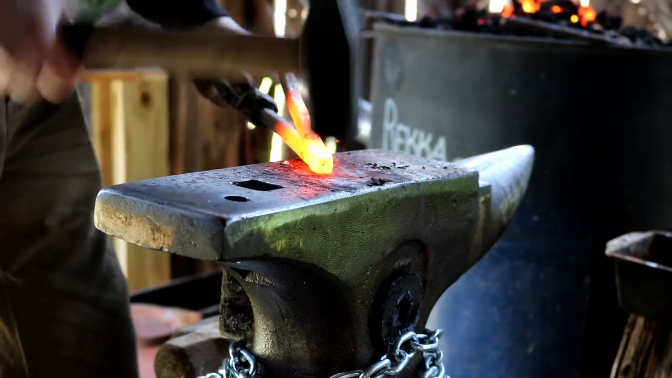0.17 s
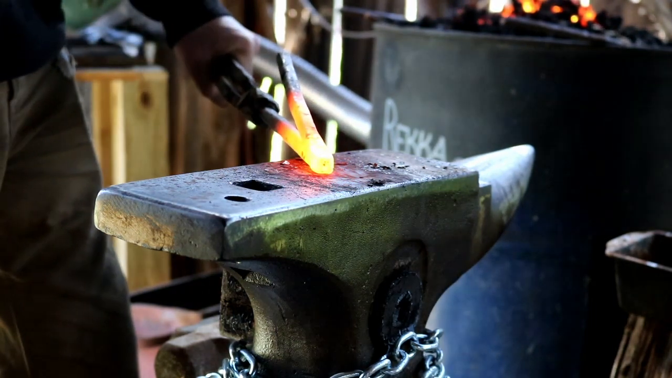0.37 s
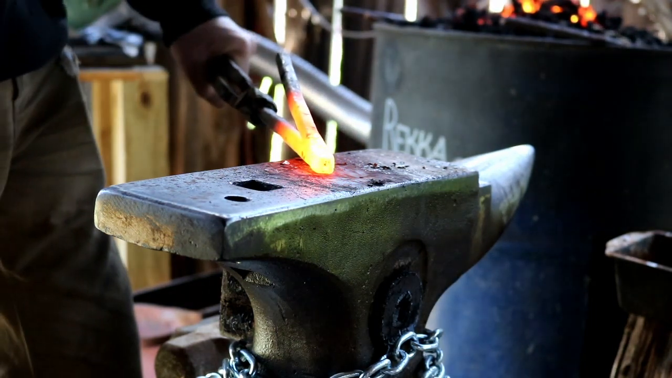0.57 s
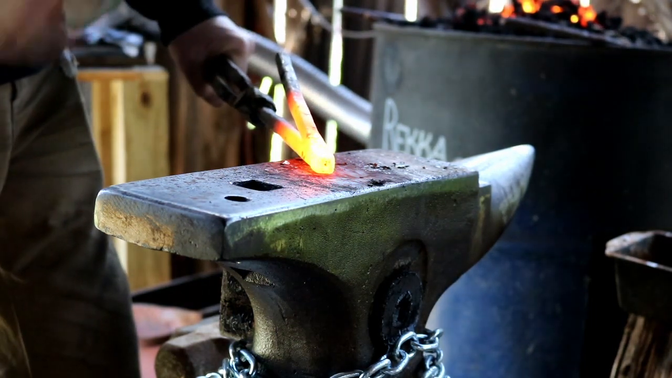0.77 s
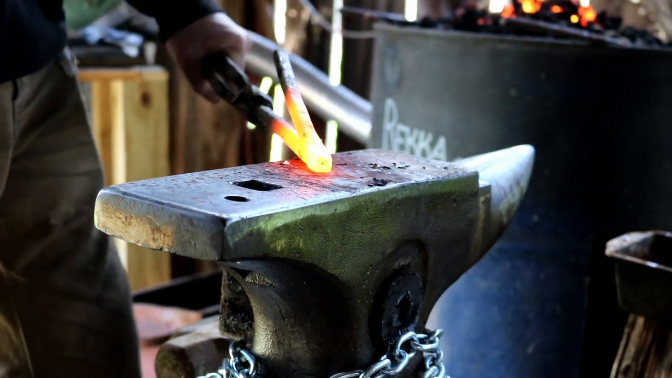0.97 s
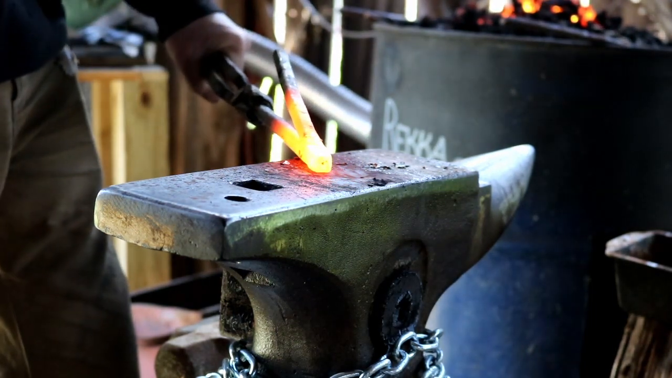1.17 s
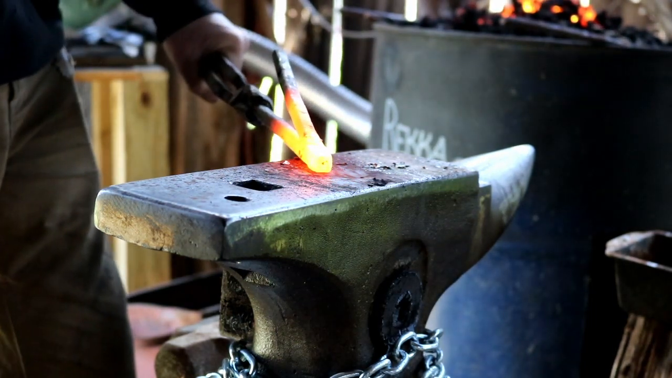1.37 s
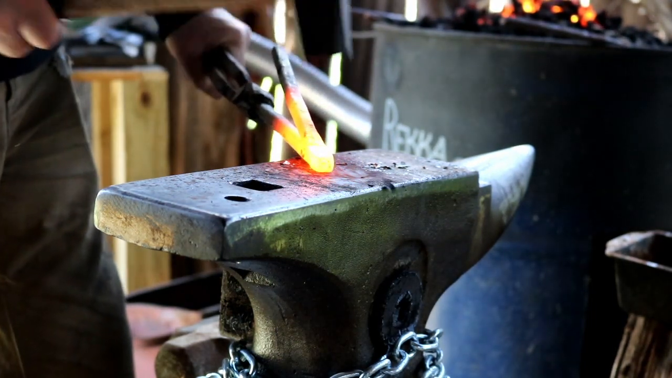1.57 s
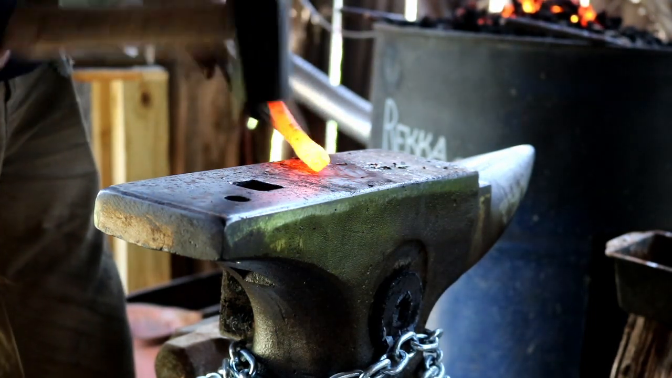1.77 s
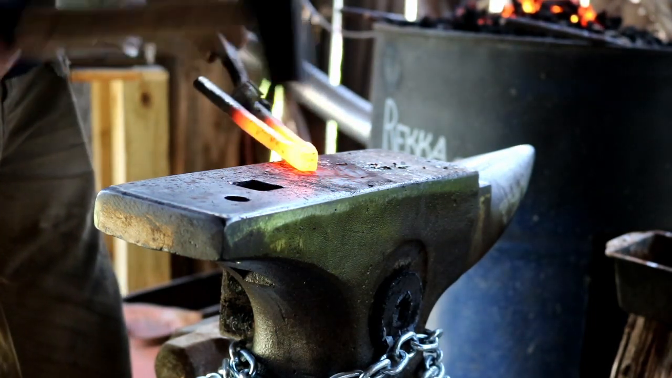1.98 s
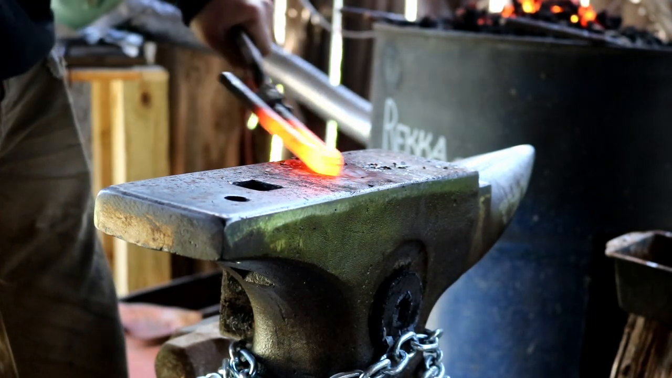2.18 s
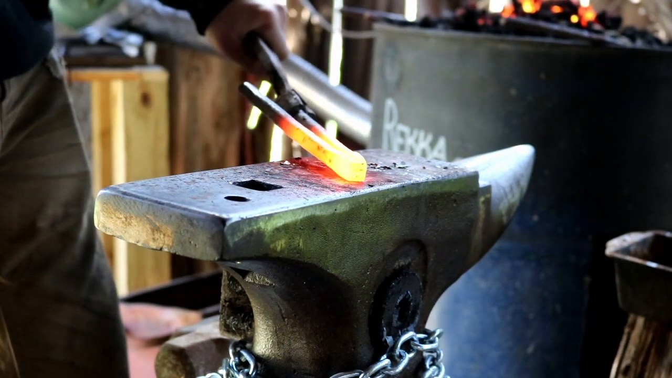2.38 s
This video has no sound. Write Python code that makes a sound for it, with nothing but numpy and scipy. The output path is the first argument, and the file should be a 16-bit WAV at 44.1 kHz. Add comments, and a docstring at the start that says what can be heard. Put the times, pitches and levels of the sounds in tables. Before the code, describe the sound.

A hand hammer strikes hot steel on an anvil with hard, bright cracks at about 0.2, 0.9 and 1.5 seconds, each with a brief ping, short damped ring and faint low boom. A tiny tick of the shifted bar comes at 1.8, then a lighter, duller blow at 1.9. The small forge echoes briefly over quiet rumble and wide hiss; the close microphone overloads on the hard blows.

```python
"""A hand hammer draws out a hot steel bar on an anvil: three hard blows, a small tick, then a lighter, duller blow.
Each blow is a crack of shaped noise, a brief ping of the hammer head and the short ring of the chained anvil
(fading sine waves), with a crowd of weak clang tones and a low boom of the stand.
The small forge answers for a third of a second, over a quiet rumble and a wider hiss.
The near microphone overloads on the hard blows."""
import sys
import numpy as np
from scipy import signal
from scipy.fft import rfft, irfft
from scipy.io import wavfile
from scipy.ndimage import uniform_filter1d

SR = 44100
rng = np.random.default_rng(int(sys.argv[2]) if len(sys.argv) > 2 else 0)


def materialize(psi):
    """Save the field psi as 16-bit PCM at rate SR to the path in sys.argv[1].

    A 1-D psi becomes a single channel; in a 2-D psi each row is a channel.
    """
    bounded = np.clip(np.atleast_2d(psi).T, -1, 1)
    quanta = np.round(bounded * 32767).astype(np.int16)
    wavfile.write(sys.argv[1], SR, quanta)


N = 110250
TIME = np.arange(N) / SR


def from_db(db):
    """Turn decibels into a gain."""
    return 10 ** (np.asarray(db) / 20)


def rms_one(x):
    """Scale a sound so that its rms is 1."""
    return x / np.sqrt(np.mean(x ** 2) + 1e-20)


def at_hz(points, hz):
    """Read a table between its rows, on a log-frequency axis."""
    table_hz, values = np.transpose(points)
    return np.interp(np.log(np.maximum(hz, 1)), np.log(table_hz), values)


def coloured(x, spectrum):
    """Make each frequency louder or softer, following a table of f/Hz, level/dB."""
    hz = np.arange(len(x) // 2 + 1) * SR / len(x)
    return irfft(rfft(x) * from_db(at_hz(spectrum, hz)), len(x))


def noise(spectrum):
    """Steady noise of a given colour, rms 1."""
    return rms_one(coloured(rng.standard_normal(N), spectrum))


def butter(x, hz, kind):
    """Butterworth filter built at order 2."""
    sections = signal.butter(2, np.clip(hz, 10, .47 * SR), kind, fs=SR, output="sos")
    return signal.sosfilt(sections, x + 1e-18)


def dying(start, t60, hold=0):
    """Envelope that jumps up at start, holds, then falls 60 dB in every t60 seconds."""
    fall_db = 60 * np.clip((TIME - start - hold) / t60, 0, 4)
    return (TIME >= start) * from_db(-fall_db)


# forge rumble and hiss: f/Hz, level/dB (per Hz, relative)
FLOOR_COLOUR = [(12, -31), (20, -4), (53, -1.5), (137, -6), (171, -10.5), (252, -11), (282, -14),
                (372, -13.5), (746, -17.5), (811, -17), (1230, -20), (6720, -22.5), (15500, -22)]
# how wide the hiss is: f/Hz, level/dB (side minus mid)
SIDE_COLOUR = [(60, -16), (180, -8), (550, -6.5), (1650, -3.5), (4970, -2), (15000, -3)]
FLOOR_DB = -58


def forge_floor():
    """Steady rumble and hiss: separate mid and side noises, the side strongest in the treble."""
    mid = from_db(FLOOR_DB) * noise(FLOOR_COLOUR)
    side = from_db(FLOOR_DB) * coloured(noise(FLOOR_COLOUR), SIDE_COLOUR)
    return mid, side


# crack of hammer, bar and scale: f/Hz, level/dB (per Hz, relative)
CRACK_COLOUR = [(60, -24), (130, -7), (200, -1), (280, -10.5), (370, -5), (520, -14.5), (720, -4.5),
                (1000, -2.5), (1350, -3.5), (1750, 3.5), (2300, 7), (2900, -4), (3500, 0), (4900, -6.5),
                (6500, -3), (10000, 5.5), (11800, -5), (15500, -3)]
CRACK_T60_S, RATTLE_T60_S, RATTLE_DB = 0.025, 0.039, -11
EVEN_WIDTH_HZ = 220


def crack(start, db, top_hz, bottom_hz):
    """The contact itself, then a short rattle of bar and tongs: a fast-dying burst of noise."""
    shape = dying(start, CRACK_T60_S) + from_db(RATTLE_DB) * dying(start, RATTLE_T60_S)
    bins = rfft(rng.standard_normal(N) * shape)
    # even out the spectrum, so that all blows share one colour before their own top and bottom cuts
    local_power = uniform_filter1d(np.abs(bins) ** 2, size=int(EVEN_WIDTH_HZ * N / SR))
    even = irfft(bins / np.sqrt(local_power), N)
    burst = rms_one(coloured(even, CRACK_COLOUR) * (TIME >= start))
    burst = burst * np.sqrt(np.mean(shape ** 2))
    return from_db(db) * butter(butter(burst, top_hz, "low"), bottom_hz, "high")


# the waver grows to its full share over the build time, as the room's reflections arrive
WAVER_SHARE, WAVER_HZ, WAVER_BUILD_S = .85, 36, 0.022


def waver(age):
    """Gain and phase of one tone as the room's reflections mix with it."""
    knots = np.arange(0, 1, 1 / (2 * WAVER_HZ))
    re, im = rng.standard_normal((2, len(knots))) / np.sqrt(2)
    wander = np.interp(age, knots, re + 1j * im)
    return 1 + WAVER_SHARE * np.minimum(age / WAVER_BUILD_S, 1) * wander


RING_BEND = 1.4   # above 1: a tone lingers, then drops


def ring(start, modes_hz, t60s, levels_db):
    """Natural tones (modes) of struck steel, each a wavering sine that falls 60 dB in its t60."""
    age = TIME[:SR]
    out = np.zeros(N + SR)
    first = int(start * SR)
    for hz, t60, db in zip(modes_hz, t60s, levels_db):
        turning = waver(age) * np.exp(2j * np.pi * hz * age)
        partial = np.imag(turning) * rng.choice([-1, 1])
        fall_db = 60 * np.minimum(age / t60, 3) ** RING_BEND
        out[first:first + SR] += from_db(db - fall_db) * partial
    return out[:N]


# hammer head modes: f/Hz
HEAD_MODES_HZ = [990, 2275, 8215, 10280, 12745]
# time for each head mode to fall 60 dB: t/s
HEAD_FADE_S = [0.11, .07, 0.073, 0.033, 0.016]
# how hard each blow excites the head, one row a blow, one column a mode: level/dB (relative)
HEAD_STRIKES = [(-22.5, -19, -22, -11, -28.5), (-23.5, -24.5, -10.5, -9.5, -3.5),
                (-25.5, -19.5, -13, -6, -8), (-37.5, -26, -24.5, -16, -19.5)]
HEAD_DB = 3


def hammer_head(start, levels_db):
    """Brief ping of the hammer head's few modes."""
    return from_db(HEAD_DB) * ring(start, HEAD_MODES_HZ, HEAD_FADE_S, levels_db)


# anvil modes: f/Hz
ANVIL_MODES_HZ = [1098, 1147, 1970, 2335, 3545, 4135, 4597, 5634, 6010, 6770, 7437, 8199, 9997, 10781,
                  12050, 13025, 14870, 15475]
# time for each anvil mode to fall 60 dB: t/s
ANVIL_FADE_S = [0.22, 0.24, 0.26, 0.18, 0.23, .2, 0.14, .18, .13, .2, .2, 0.18, .18, 0.26, 0.3, .32, .25,
                .45]
# how hard each blow excites the anvil from the spot where it lands,
# one row a blow, one column a mode: level/dB (relative)
ANVIL_STRIKES = [(-34, -34, -34.5, -30, -39, -41.5, -45, -41.5, -23.5, -34, -36.5, -17, -17, -24, -46, -47, -45.5, -52),
                 (-30, -33, -29, -32, -33, -39, -40, -36, -26, -32, -39, -16, -25, -41.5, -41, -48, -45.5, -50.5),
                 (-32.5, -38, -28.5, -25.5, -36, -33, -45.5, -34.5, -31.5, -30.5, -29, -19.5, -24.5, -29, -38.5, -41, -46.5, -56.5),
                 (-33.5, -31.5, -32, -21.5, -31.5, -26.5, -20.5, -39, -19, -42, -56.5, -36.5, -39.5, -44.5, -47.5, -57.5, -70, -79)]
ANVIL_DB = -0.5


def anvil(start, levels_db):
    """Short ring of the chained anvil's modes."""
    return from_db(ANVIL_DB) * ring(start, ANVIL_MODES_HZ, ANVIL_FADE_S, levels_db)


CLANG_LOW_HZ, CLANG_HIGH_HZ, CLANG_T60_S, CLANG_SPREAD_DB = 2214, 6527, .2, 1


def clang(start, db, count=24):
    """Many weak, close modes of bar, tongs and anvil that roughen the ring."""
    modes_hz = np.geomspace(CLANG_LOW_HZ, CLANG_HIGH_HZ, count) * rng.uniform(.98, 1.02, count)
    levels_db = db + CLANG_SPREAD_DB * rng.standard_normal(count)
    return ring(start, modes_hz, np.full(count, CLANG_T60_S), levels_db)


BOOM_HZ, BOOM_WIDTH_HZ = 60, 20
BOOM_RISE_S, BOOM_HOLD_S, BOOM_T60_S = .008, 0.16, .18


def boom(start, db):
    """Low shudder of stand and shed: a narrow band of noise that swells, holds and dies."""
    band_hz = [BOOM_HZ - BOOM_WIDTH_HZ / 2, BOOM_HZ + BOOM_WIDTH_HZ / 2]
    rumble = butter(rng.standard_normal(N), band_hz, "band")
    rise = np.clip((TIME - start) / BOOM_RISE_S, 0, 1)
    shape = dying(start, BOOM_T60_S, BOOM_HOLD_S) * rise
    loudness = np.sqrt(np.average(rumble ** 2, weights=shape ** 2))
    return from_db(db) * rumble * shape / loudness


# time for the room's echo to fall 60 dB: f/Hz, t/s
ROOM_FADE = [(100, 0.4038), (300, 0.2749), (1000, 0.2636), (2500, 0.2133), (6000, 0.1783), (10000, 0.17),
             (15000, 0.11)]
# colour of the room's echo: f/Hz, level/dB (relative)
ROOM_TONE = [(100, 3.5), (240, -5), (380, -1), (650, 4), (1000, 3.5), (2500, -6.5), (6000, 1), (10000, -5),
             (15000, 7)]
ROOM_DELAY_S, ROOM_BUILD_S, ROOM_BEND = .002, .003, 1.047   # bend above 1: the tail lingers, then drops


def room_response():
    """Dense reflections of the forge: bands of noise, dying faster in the treble; energy 1."""
    hz = np.arange(SR // 2 + 1)
    white = rfft(rng.standard_normal(SR))
    age = np.maximum(TIME[:SR] - ROOM_DELAY_S, 0)
    edges, out = np.geomspace(40, 18000, 25), 0
    for low, high in zip(edges, edges[1:]):
        centre = np.sqrt(low * high)
        band = irfft(white * (hz >= low) * (hz < high), SR)
        fall_db = 60 * np.minimum(age / at_hz(ROOM_FADE, centre), 3) ** ROOM_BEND
        out = out + band * from_db(at_hz(ROOM_TONE, centre) - fall_db)
    out = out * (1 - np.exp(-age / ROOM_BUILD_S))
    return out / np.sqrt(np.sum(out ** 2))


# tick of the bar: f/Hz, level/dB (per Hz, relative)
TICK_COLOUR = [(200, -30), (2000, -21.5), (5000, -7.5), (9500, 3), (12000, 2), (15500, -3.5)]
TICK_S, TICK_DB, TICK_T60_S, TICK_ROOM_DB = 1.8112, -36.5, 0.0057, -4
TICK_RATTLE_DB, TICK_RATTLE_T60_S = -11, 0.065


def tick():
    """Small bright tick as the bar is shifted: a very short noise burst with a weaker rattle."""
    rattle = from_db(TICK_RATTLE_DB) * dying(TICK_S, TICK_RATTLE_T60_S)
    shape = dying(TICK_S, TICK_T60_S) + rattle
    return from_db(TICK_DB) * noise(TICK_COLOUR) * shape


# hammer blows: t/s, crack level/dB, crack top f/Hz, crack bottom f/Hz,
# room level/dB (against the crack), boom level/dB, ring level/dB, clang level/dB
HAMMER_BLOWS = [(0.2259, 4, 12950, 152.5, -5, -52, 5.5, -42.5),
                (0.8849, 3, 15630, 156.1, -4.5, -52, 4, -34.5),
                (1.5250, 5.5, 14800, 167, -7.5, -55, 5.5, -36),
                (1.9295, -11, 5500, 181.4, -6, -68.5, -3.5, -40.5)]


def scene():
    """Blows and tick in the room, in mono, over a low rumble and a wider hiss."""
    direct = tick()
    to_room = from_db(TICK_ROOM_DB) * direct
    for blow, on_anvil, on_head in zip(HAMMER_BLOWS, ANVIL_STRIKES, HEAD_STRIKES):
        start, db, top_hz, bottom_hz, room_db, boom_db, ring_db, clang_db = blow
        contact = crack(start, db, top_hz, bottom_hz)
        steel = from_db(ring_db) * (hammer_head(start, on_head) + anvil(start, on_anvil))
        direct = direct + contact + steel + clang(start, clang_db) + boom(start, boom_db)
        to_room = to_room + from_db(room_db) * contact   # only cracks and tick feed the room
    echo = signal.fftconvolve(to_room, room_response())[:N]
    floor_mid, side = forge_floor()
    mid = direct + echo + floor_mid
    return np.array([mid + side, mid - side])


LIMIT_DB, LIMIT_SHARE = -11, 0.72   # share of the excess in dB that is turned down
RELEASE_DB_PER_S, LIMIT_ATTACK_S = 77.5, 0.00088
CLIP_TOP, CUTOFF_HZ = 1, 15600


def record(dry):
    """A limiter ducks loud sound and recovers slowly, peaks left over clip, the top treble is cut."""
    power = np.abs(uniform_filter1d(dry[0] ** 2, size=88))   # averaged over 2 ms
    level_db = 10 * np.log10(power + 1e-12)
    over_db = LIMIT_SHARE * np.maximum(level_db - LIMIT_DB, 0)
    # hold the deepest ducking so far, letting go at the release speed
    release_db = RELEASE_DB_PER_S * TIME
    held_db = np.maximum.accumulate(over_db + release_db) - release_db
    r = np.exp(-1 / (LIMIT_ATTACK_S * SR))
    duck_db = signal.lfilter([1 - r], [1, -r], held_db)
    clipped = np.clip(dry * from_db(-duck_db), -CLIP_TOP, CLIP_TOP)
    top_cut = signal.cheby1(12, .2, CUTOFF_HZ, fs=SR, output="sos")
    return signal.sosfilt(top_cut, clipped)


dry = scene()
out = record(dry)
materialize(out)
```